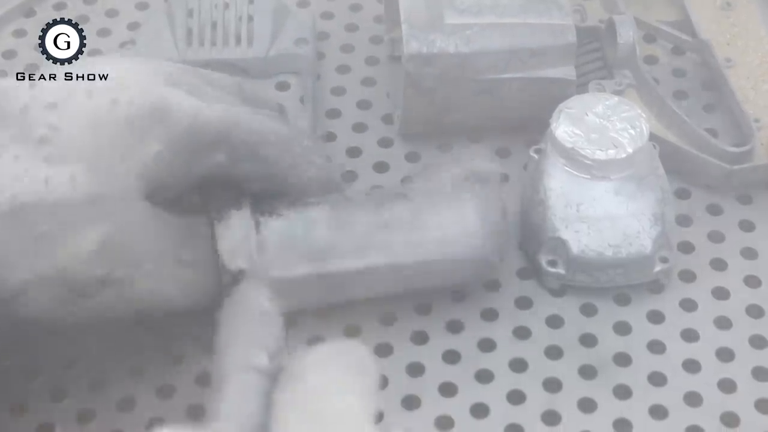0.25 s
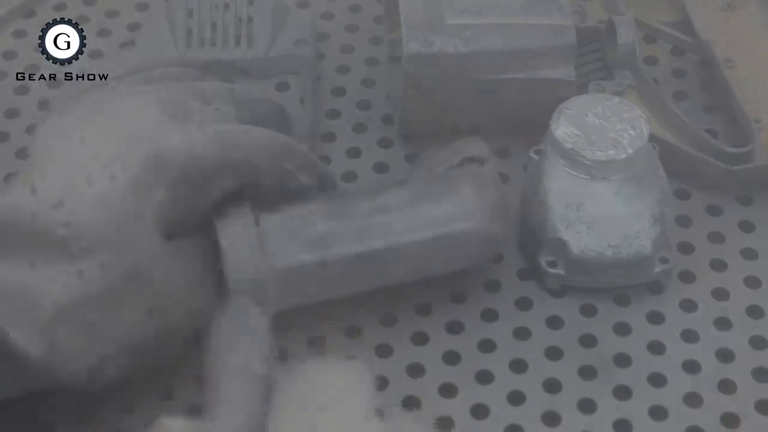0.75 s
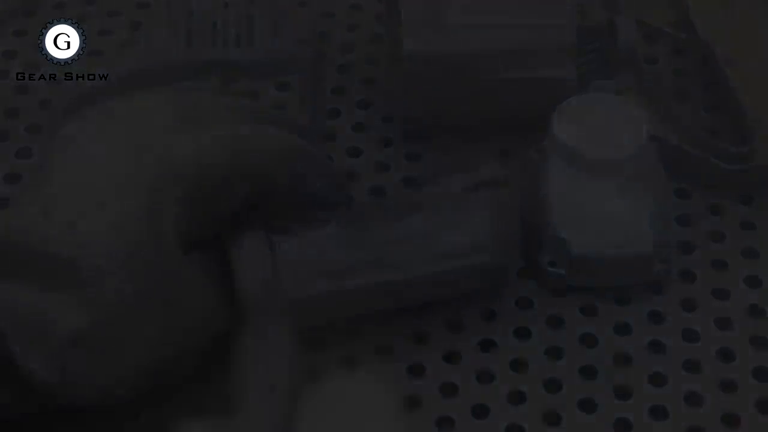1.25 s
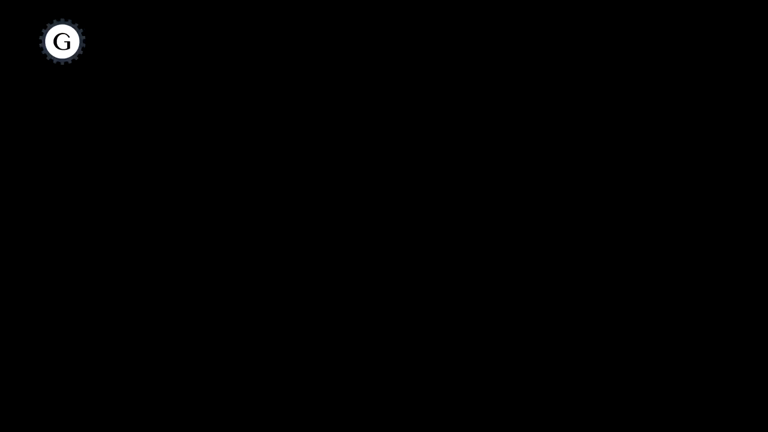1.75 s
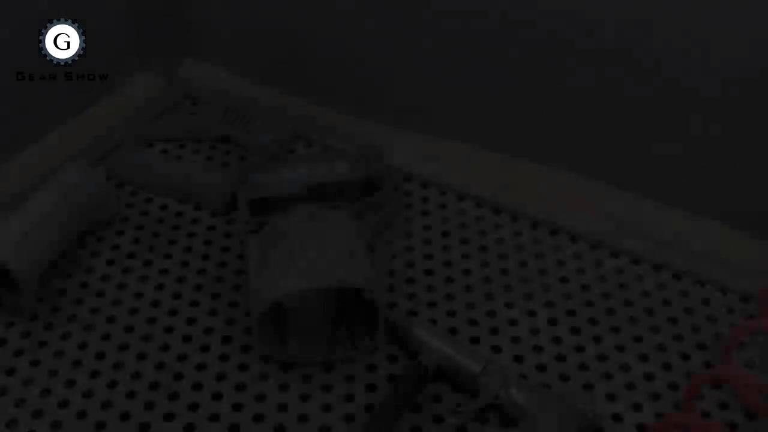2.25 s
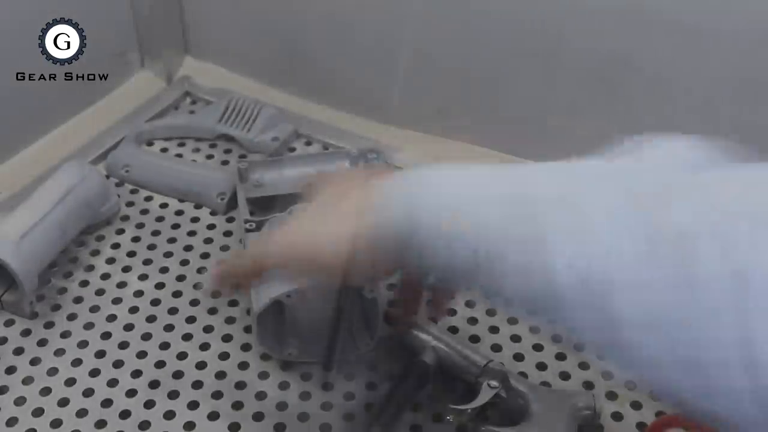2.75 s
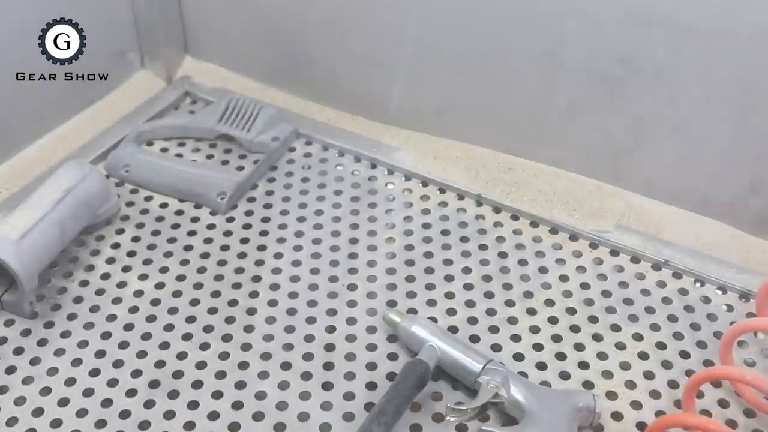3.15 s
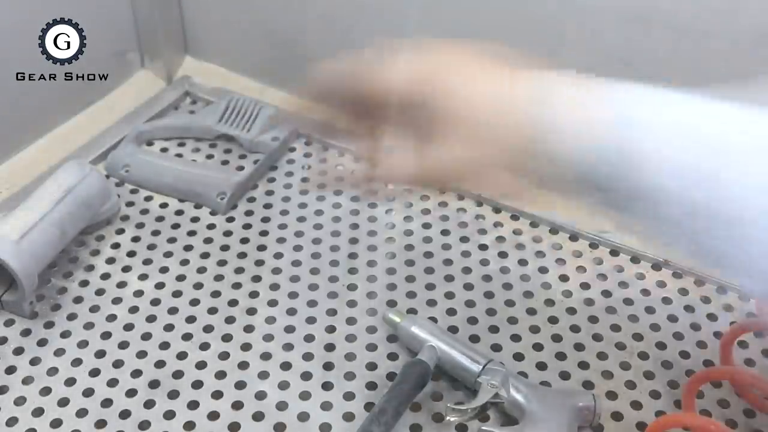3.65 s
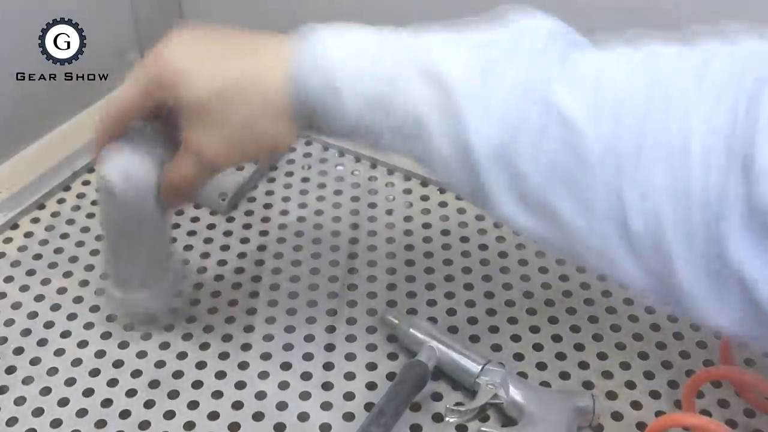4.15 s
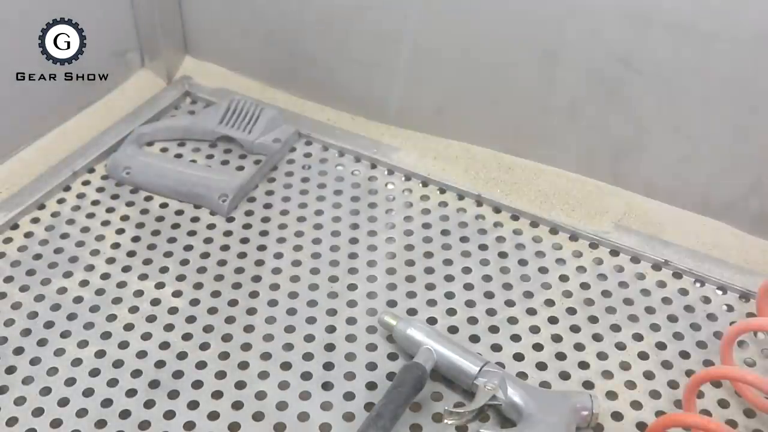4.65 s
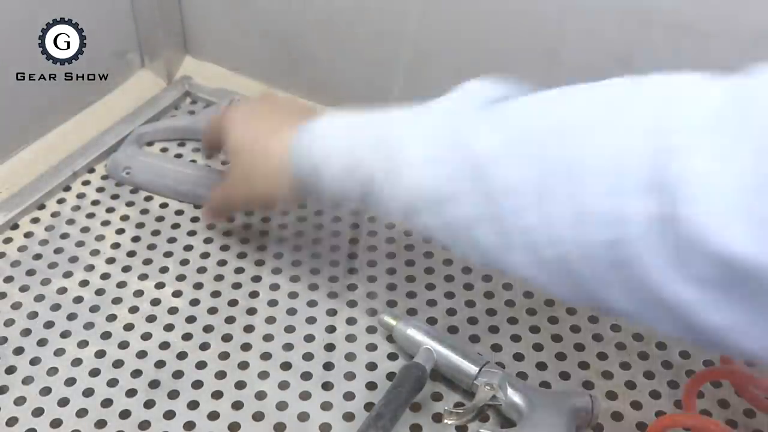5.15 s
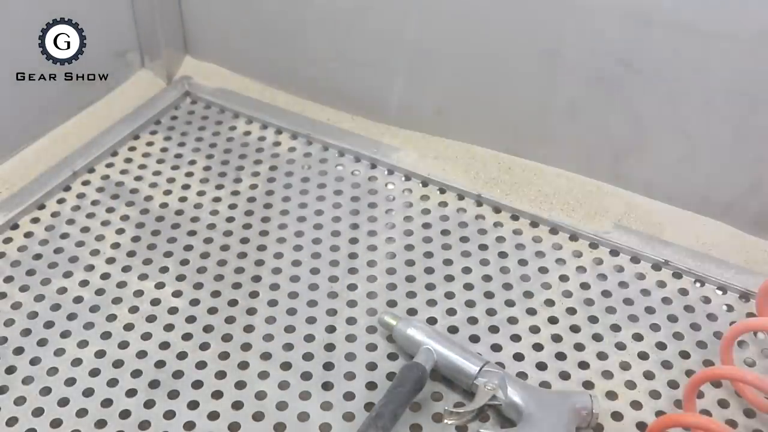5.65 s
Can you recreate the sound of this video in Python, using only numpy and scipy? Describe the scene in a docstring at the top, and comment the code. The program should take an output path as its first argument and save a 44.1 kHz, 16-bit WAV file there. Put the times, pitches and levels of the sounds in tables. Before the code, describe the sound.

The sound starts inside a steel cabinet with an air gun blasting grit at a metal part: a dense mid-low roar, gritty bright hiss, a wavering hollow howl near 630 Hz and a thin high whistle. The hiss steps up at 0.4 s; from then the blast fades smoothly, with a small hole singing around 1.0-1.3 s, to silence at 1.9 s. A faint rush of air fades in. Small knocks and a tick at 2.2 s precede a loud latch-and-slam door bang at 2.4 s. Light knocks and brushing follow near 3 s. Thumps at 4.0 s lead to three hard knocking scrapes at 4.2-4.33 s with bright tubular ringing. A strong hollow clang rings at 4.78 s, a faint one at 5.05 s. Thin shell-like rings come at 5.3 s, a soft brush at 5.5 s, and a softer clang at 5.9 s. Close microphone, short metallic reverberation.

```python
"""Grit blasting in a steel cabinet

An air gun blasts grit at a metal housing: filtered noise roars and hisses, a hollow howl and a thin whistle are
drifting sines. The blast is faded out to silence and a faint rush of air fades in. The door bangs open; parts are
lifted off the perforated grate, knocking and scraping, and set down with a clang: clicks excite coloured echoes,
and decaying sines ring as modes. Random echoes stand for the reverberation between the steel walls."""
import sys
import numpy as np
from scipy import signal
from scipy.fft import rfft, irfft
from scipy.io import wavfile

SR = 44100
rng = np.random.default_rng(int(sys.argv[2]) if len(sys.argv) > 2 else 0)


def put_to_file(sound):
    """Save the sound as 16-bit audio at rate SR, in the file named by the first command-line argument."""
    columns = np.atleast_2d(sound).T  # one column per channel
    safe = np.clip(columns, -1, 1)
    whole_steps = np.round(safe * 32767)
    wavfile.write(sys.argv[1], SR, whole_steps.astype(np.int16))


N = 260615
TIME = np.arange(N) / SR


def from_db(db):
    """Decibel law: level to amplitude gain."""
    return 10 ** (np.asarray(db) / 20)


def rms_one(x):
    """Normalisation: scale to unit mean power."""
    return x / np.sqrt(np.mean(x ** 2) + 1e-20)


def in_time(rows):
    """Linear interpolation: each column of a curve, at every sample."""
    s, *columns = np.transpose(rows)
    return [np.interp(TIME, s, c) for c in columns]


def at_hz(points, hz):
    """Logarithmic interpolation: read a table on a log-frequency axis."""
    f, value = np.transpose(points)
    return np.interp(np.log(hz + 1e-3), np.log(f), value)


def ramp(start_s, length_s):
    """Linear envelope: rises from 0 to 1 over the given time, then holds."""
    return np.clip((TIME - start_s) / length_s, 0, 1)


def hump(start_s, length_s):
    """Arched envelope: the root of a half sine rises steeply and falls back to 0 over the given time."""
    return np.sqrt(np.abs(np.sin(np.pi * ramp(start_s, length_s))))


def add(out, s, sound):
    """Superposition: mix a sound in at time s."""
    start = int(round(s * SR))
    out[start:start + len(sound)] += sound[:max(N - start, 0)]


def drift(rate):
    """Slow random modulation of rms 1: straight lines between random knots, rate of them per second."""
    knots = rng.standard_normal(int(N / SR * rate) + 3)
    return rms_one(np.interp(TIME * rate, np.arange(len(knots)), knots))


def colour(x, spectrum, tilt_db=0, size=4096):
    """Minimum-phase filtering: the folded cepstrum makes the spectrum causal; the tilt acts above about 500 Hz."""
    hz = np.arange(size // 2 + 1) * SR / size
    level_db = at_hz(spectrum, hz) + tilt_db * np.log2(1 + hz / 500)
    cepstrum = irfft(np.log(from_db(level_db)))
    cepstrum[1:size // 2] *= 2
    cepstrum[size // 2 + 1:] = 0
    return signal.fftconvolve(x, irfft(np.exp(rfft(cepstrum))))[:len(x)]


def resonate(x, hz, width):
    """Two-pole resonance: a band of the given width in Hz passes, with a gain of about 1 at its peak."""
    r = np.exp(-np.pi * width / SR)
    zeros = np.array([1, 0, -1]) * (1 - r * r) / 2
    poles = [1, -2 * r * np.cos(2 * np.pi * hz / SR), r * r]
    return signal.lfilter(zeros, poles, x)


# reverberation of the cabinet: f/Hz, t60/s
DECAY_TIMES = [(100, 0.75), (300, 0.44), (900, 0.36), (1800, 0.46), (5000, 0.36), (9000, 0.3),
               (15000, 0.23)]


def cabinet(build_s=0.0047, direct=0.031):
    """Diffuse reverberation: a click, then dense echoes that build up and decay at a rate set by frequency."""
    t, hz = TIME[:SR], np.arange(SR // 2 + 1.)
    echoes, out = rfft(rng.standard_normal(SR)), 0
    for k, (_, t60) in enumerate(DECAY_TIMES):
        # overlapping bands, each a triangle on the log-frequency axis
        share = at_hz([(f, j == k) for j, (f, _) in enumerate(DECAY_TIMES)], hz)
        out = out + irfft(echoes * share) * from_db(-60 * t / t60)
    out = out * (1 - np.exp(-t / build_s))
    return out / np.linalg.norm(out) + direct * (t == 0)


def blows(rows, spectrum, walls, chatter_s, order=2048):
    """Impact excitation: a click and a dying chatter of contacts, coloured by the struck body and its echoes."""
    out, t = np.zeros(N), TIME[:order]
    for s, level_db, tilt_db in rows:
        contact = (rng.random(order) < 500 / SR) * rng.standard_normal(order)    # 500 contacts per second
        contact = contact * 0.36 * np.exp(-t / max(chatter_s, 1e-4))
        contact[0] = 1
        sound = colour(signal.fftconvolve(walls, contact), spectrum, tilt_db)
        add(out, s, from_db(level_db) * sound / np.std(sound[:order]))
    return out


def ringing(rows, modes, swell_cycles, beat_hz, beat):
    """Modal decay: modes swell as their echoes pile up, the low ones more slowly, and beat while dying away."""
    out, t = np.zeros(N), TIME[:SR]
    for s, level_db in rows:
        for hz, mode_db, t60 in modes:
            phase, beat_phase, split = rng.uniform(0, 2 * np.pi, 3)
            swell = 1 - np.exp(-(t * hz / swell_cycles) ** 2)
            # each mode beats at between half and one and a half times beat_hz
            beating = 1 + beat * np.sin(beat_phase + 2 * np.pi * beat_hz * (1 + .5 * np.cos(split)) * t)
            decay = from_db(level_db + mode_db - 60 * t / t60)
            add(out, s, np.sin(2 * np.pi * hz * t + phase) * swell * beating * decay)
    return out


# spectrum of the background air: f/Hz, relative level/dB
AIR_COLOUR = [(24, -58.5), (40, -9.5), (96, -27), (162, -6), (336, -2.5), (597, -5), (937, -9.5),
              (1400, -11.5), (15800, -28.5)]
# fades in from the silence after the blast, then holds
SILENCE_AT_S, AIR_DB, FADE_IN_S = 1.919, -56.5, 0.33


def workshop(walls, dull_hz=2000):
    """Broadband flow noise: a faint rush of air around the cabinet fades in, the treble last."""
    fade = ramp(SILENCE_AT_S, FADE_IN_S)
    rush = rng.standard_normal(N)
    echoes = signal.fftconvolve(rush, walls)[:N]
    rush = rms_one(colour(rush + 0.54 * echoes, AIR_COLOUR))
    dull = signal.sosfilt(signal.butter(2, dull_hz, fs=SR, output="sos"), rush)
    return from_db(AIR_DB + drift(10)) * fade * (fade * rush + (1 - fade) * dull)


# soft brushing touches: t/s, relative level/dB, brightness/(dB per octave)
BRUSH_TOUCHES = [(3.162, -42, -2.2), (4.167, -43, 5), (5.530, -49, -3)]
# spectrum of a touch: f/Hz, relative level/dB
BRUSH_SPECTRUM = [(2000, -35), (2900, -7.5), (5000, -23), (7800, 0), (11000, -4), (14200, 4), (16000, -8)]


def brushing():
    """Diffuse excitation: a soft touch swells with hardly any direct click."""
    soft = cabinet(build_s=0.019, direct=.01)
    return from_db(-7.5) * blows(BRUSH_TOUCHES, BRUSH_SPECTRUM, soft, chatter_s=0.0087)


# gritty ticks: t/s, relative level/dB
GRIT_TICKS = [(2.209, -37), (2.849, -44.5), (3.776, -42), (4.612, -48), (5.338, -43), (5.38, -44)]
# spectrum of a tick: f/Hz, relative level/dB
TICK_SPECTRUM = [(1500, -22), (2900, 0.5), (4500, -3), (8000, -2), (16000, -9)]


def ticking(near):
    """Brief impact: a tick is a bright click with a short chatter."""
    rows = [(s, db, 0) for s, db in GRIT_TICKS]
    return from_db(-10.0) * blows(rows, TICK_SPECTRUM, near, chatter_s=0.005)


# single rings and thumps that colour knocks and touches, one mode each: t/s, f/Hz, level/dB, t60/s
SINGLE_RINGS = [(2.173, 1030, -36, 0.059), (2.224, 1107, -35.5, 0.1), (2.222, 308, -32, 0.17),
                (2.849, 2900, -50, 0.12), (2.961, 321, -42, 0.32), (2.969, 3950, -51, 0.36),
                (2.963, 3500, -54, 0.25), (4.063, 219, -31.5, 0.15), (4.205, 6300, -45, 0.25),
                (5.48, 1421, -52.5, 0.37), (5.598, 3520, -57, 0.27)]


def single_ringing():
    """Single-mode vibration: each ring or thump is one decaying, beating sine."""
    return sum(ringing([(s, db)], [(hz, 0, t60)], swell_cycles=2.2, beat_hz=30, beat=0.34)
               for s, hz, db, t60 in SINGLE_RINGS)


# the grip is dragged over the grate in three tugs: t/s, level/dB
TUGS = [(4.182, -31), (4.255, -29.5), (4.319, -32.5)]
# spectrum of the scraping: f/Hz, relative level/dB
SCRAPE_SPECTRUM = [(150, -18.5), (480, 4), (1200, -6.5), (4700, -5.5), (5600, -17), (15000, -28)]
# each tug is a run of uneven slips
DRAG_S, SLIPS_PER_S, SLIP_SPREAD_DB = 0.041, 264, 4


def scraping():
    """Stick-slip friction: each tug is a burst of sharp, uneven contacts."""
    walls = cabinet(build_s=0.002, direct=0.86)    # the dragged edge faces the microphone
    stroke = sum(from_db(db) * hump(s, DRAG_S) for s, db in TUGS)
    slips = (rng.random(N) < SLIPS_PER_S / SR) * rng.choice([-1, 1], N)
    slips = slips * from_db(SLIP_SPREAD_DB * rng.uniform(-1, 1, N))
    response = colour(walls, SCRAPE_SPECTRUM)
    return signal.fftconvolve(stroke * rms_one(slips), response / np.linalg.norm(response))[:N]


# the grip catches on the holes of the grate: t/s, level/dB
GRIP_CATCHES = [(4.188, -50), (4.258, -45), (4.327, -42), (4.348, -41.5)]
# modes of the tubular grip: f/Hz, relative level/dB, t60/s
GRIP_MODES = [(7000, -10, 0.24), (7950, -7, 0.32), (8500, -1, 0.23), (11700, -10, .19), (12840, -11, .18)]


def grip_ringing():
    """Modal vibration of a tube: bright modes ring at every catch."""
    return ringing(GRIP_CATCHES, GRIP_MODES, swell_cycles=83, beat_hz=25, beat=0.55)


# blows that set the thin shell ringing: t/s, level/dB
SHELL_BLOWS = [(5.311, -48), (5.353, -40.5)]
# modes of the thin shell: f/Hz, relative level/dB, t60/s
SHELL_MODES = [(3020, 0.5, 0.38), (3460, -2, 0.29), (6869, -13, 0.28), (7560, -18, .25), (9076, -13, 0.35),
               (12950, -16, .24)]


def shell_ringing():
    """Modal vibration of a shell: high modes ring and beat strongly."""
    return ringing(SHELL_BLOWS, SHELL_MODES, swell_cycles=56, beat_hz=19.6, beat=0.62)


# parts knocking on the grate: t/s, relative level/dB, brightness/(dB per octave)
GRATE_KNOCKS = [(2.174, -36.5, -2), (2.224, -30.5, -3), (2.960, -40, 1.5), (3.990, -33, -1.8),
                (4.057, -31.5, -1.3), (4.174, -31, 1), (4.185, -20, 0.4), (4.257, -20, -0.9),
                (4.327, -22.5, 0.2), (5.310, -33, -0.5), (5.358, -35.5, 2)]
# spectrum of a knock: f/Hz, relative level/dB
GRATE_SPECTRUM = [(45, -52), (130, -12.5), (184, -13.5), (216, -5), (470, -2), (550, -5), (745, -7),
                  (1110, -13), (3560, -18.5), (5420, -27), (8640, -29.5), (15800, -41)]
# modes of the grate under every knock: f/Hz, relative level/dB, t60/s
GRATE_MODES = [(217, -14, 0.28), (329.2, -7, 0.31), (460, -6, 0.13)]
# every knock rebounds once, more softly
REBOUND_S, REBOUND_LOSS_DB = 0.024, 8


def knocking(near):
    """Impact with rebound: the part strikes the grate twice, and the first blow sets its modes ringing."""
    rebounds = [(s + REBOUND_S, db - REBOUND_LOSS_DB, tilt) for s, db, tilt in GRATE_KNOCKS]
    knocks = from_db(-9.5) * blows(GRATE_KNOCKS + rebounds, GRATE_SPECTRUM, near, chatter_s=0.015)
    hits = [(s, db) for s, db, _ in GRATE_KNOCKS]
    thumps = from_db(-1.5) * ringing(hits, GRATE_MODES, swell_cycles=3.8, beat_hz=18, beat=0.34)
    return knocks + thumps


# the housing is set down and rocks:
# t/s, relative level/dB, brightness/(dB per octave), ringing level/dB
HOUSING_CLANGS = [(4.767, -26, -5, -57), (4.778, -23.5, -4.5, -14), (5.05, -51.5, 0, -43.5),
                  (5.892, -29, 0, -20)]
# spectrum of the contact: f/Hz, relative level/dB
CLANG_SPECTRUM = [(150, -54.5), (750, -27), (960, -14), (1200, -19), (1450, -1.5), (1820, -12), (2100, -9),
                  (3600, -4), (4700, -21), (16000, -32)]
# modes of the hollow housing: f/Hz, relative level/dB, t60/s
HOUSING_MODES = [(931, -19, .28), (1340, -9, .19), (1427, 7.5, .24), (1431, -26, .8), (1657, -1.5, .36),
                 (2040, -13, .2), (2213, -14, .26), (2750, -15, .25), (2821, -14, .29), (3031, -11, .29),
                 (3278, -9, .26), (3463, -11, .24), (3503, -7, .29), (3646, -15, .38), (3774, -18, .36),
                 (3931, -16, .33), (5329, -16, .29), (6115, -26, .28), (7660, -21, .25)]
# its many weak upper modes lie at random pitches; UPPER_DB holds at the lowest pitch
UPPER_LOW_HZ, UPPER_HIGH_HZ, UPPER_DB, UPPER_T60_S = 4100, 11000, -29, 0.27


def clanging(near):
    """Modal vibration of a hollow body: a contact crack, then many modes that swell, beat and decay."""
    damped = near * np.exp(-TIME[:SR] / 0.36)    # hastens the decay of the crack
    cracks = [(s, db, tilt) for s, db, tilt, _ in HOUSING_CLANGS]
    clank = from_db(-2) * blows(cracks, CLANG_SPECTRUM, damped, chatter_s=0.007)
    upper = [(hz, UPPER_DB - 20 * np.log10(hz / UPPER_LOW_HZ), UPPER_T60_S)
             for hz in rng.uniform(UPPER_LOW_HZ, UPPER_HIGH_HZ, size=24)]
    rings = [(s, ring_db) for s, _, _, ring_db in HOUSING_CLANGS]
    return clank + ringing(rings, HOUSING_MODES + upper, swell_cycles=50, beat_hz=22, beat=.45)


# blows of the door, latch then slam: t/s, level/dB, brightness/(dB per octave)
DOOR_BLOWS = [(2.398, -23, 2.5), (2.410, -14.5, 2)]
# spectrum of a door blow: f/Hz, relative level/dB
DOOR_SPECTRUM = [(30, -33.5), (100, -35), (162, -24), (261, -3), (344, -6.5), (390, -18.5), (570, -8),
                 (748, -11), (1150, -10.5), (2000, -11), (3300, -17), (4500, -21.5), (5400, -18.5),
                 (7900, -20.5), (14000, -30), (15800, -41.5)]
# modes of the door panel: f/Hz, relative level/dB, t60/s
PANEL_MODES = [(264, -11, .19), (583, -8, .3), (1410, -15, .33), (1556, -18, .37), (1723, -18, .4),
               (1951, -16, .3), (2181, -16, .32), (2332, -15, .34), (2548, -14, .36), (5206, -24, .42),
               (5380, -15.5, .4)]


def door_bang(walls):
    """Plate vibration: latch and slam strike the door, and the slam sets its panel ringing."""
    bangs = blows(DOOR_BLOWS, DOOR_SPECTRUM, walls, chatter_s=0.0074)
    slam = [(DOOR_BLOWS[-1][0], -17)]
    return bangs + ringing(slam, PANEL_MODES, swell_cycles=16, beat_hz=5.1, beat=0.44)


def handling(walls):
    """Superposition of contacts: the door, parts bumping, dragging and set down, ticks and brushing touches."""
    near = cabinet(build_s=0.0013, direct=0.29)    # parts on the grate lie close to the microphone
    touches = brushing() + ticking(near) + single_ringing() + scraping()
    parts = grip_ringing() + shell_ringing() + knocking(near) + clanging(near)
    return touches + parts + door_bang(walls)


# spectrum of the roar: f/Hz, relative level/dB
ROAR_COLOUR = [(40, -63.5), (107, -38.5), (214, -9), (637, -7), (800, -10.5), (1050, -8), (2440, -18.5),
               (3270, -22), (6000, -40), (7800, -35), (13200, -120)]
# cavities that the jet excites: f/Hz, width/Hz, relative level/dB
JET_CAVITIES = [(304.3, 21.7, 2), (957, 29, 5), (1143, 25, 0), (1326, 42, -2.5), (2034, 117, -8.5),
                (2680, 140, -13), (3214, 130, -10.5), (3790, 70, -20.5)]
ROAR_DB, CAVITY_DB = -28.5, -32.5


def jet_roar(turbulence, in_cavity, walls):
    """Turbulence noise: a broadband roar, and cavities that resonate under random excitation."""
    echoes = signal.fftconvolve(turbulence, walls)[:N]
    roar = rms_one(colour(turbulence + 0.49 * echoes, ROAR_COLOUR))
    hollow = rms_one(sum(from_db(db) * resonate(in_cavity, hz, width) for hz, width, db in JET_CAVITIES))
    return from_db(ROAR_DB) * roar + from_db(CAVITY_DB) * hollow


# spectrum of air and grit: f/Hz, relative level/dB
HISS_COLOUR = [(1200, -40), (2800, 3.5), (4200, 0), (5500, -2.5), (7200, 1), (10000, -2), (13500, -5),
               (16000, -12)]
# the grit feed picks up: the hiss rises by FEED_HISS_DB
FEED_AT_S, FEED_RISE_S, HISS_DB, FEED_HISS_DB = 0.407, 0.025, -39.5, 5


def grit_hiss(air, walls, grains_per_s=9000, grit=0.76):
    """Shot noise: grit strikes the metal as a dense random spray of impulses, mixed with echoing air noise."""
    feed = ramp(FEED_AT_S, FEED_RISE_S)
    grains = (rng.random(N) < grains_per_s / SR) * rng.standard_normal(N)
    spray = signal.fftconvolve(air, walls)[:N] + grit * rms_one(grains)
    return from_db(HISS_DB + FEED_HISS_DB * feed) * rms_one(colour(spray, HISS_COLOUR))


# howl of the hollow part as the jet crosses its mouth: t/s, mean level/dB
HOWL_CURVE = [(0, -39.5), (0.3, -28), (0.53, -30.5), (0.63, -43), (1.7, -33)]


def hollow_howl(howl_hz=634):
    """Cavity tone: air blown across the mouth of the part locks onto one unsteady note."""
    howl_db, = in_time(HOWL_CURVE)
    angle = 2 * np.pi * np.cumsum(howl_hz + 4.3 * drift(45.25)) / SR
    return from_db(howl_db + 2 * drift(24.3)) * np.sin(angle)


# the nozzle whistle creeps sharp while its level varies: t/s, mean f/Hz, level/dB
WHISTLE_CURVE = [(0, 4422, -44.5), (0.21, 4429, -44.5), (0.29, 4434, -37), (0.36, 4440, -53),
                 (0.47, 4465, -43), (0.76, 4480, -55), (0.89, 4480, -47.5), (1.7, 4480, -44)]
# its first harmonics: relative level/dB
WHISTLE_HARMONICS = [0, -4.5, -16]


def nozzle_whistle():
    """Harmonic tone: a jittering fundamental and its overtones, whose levels waver more the higher they lie."""
    whistle_hz, whistle_db = in_time(WHISTLE_CURVE)
    angle = 2 * np.pi * np.cumsum(whistle_hz + 6 * drift(300)) / SR
    out = np.zeros(N)
    for harmonic, db in enumerate(WHISTLE_HARMONICS, 1):
        out += from_db(whistle_db + db + 1.5 * harmonic * drift(15.0)) * np.sin(harmonic * angle)
    return out


SING_AT_S, SING_S, SING_HZ, SING_WIDTH_HZ, SING_DB = 1.03, 0.31, 3130, 30, -42


def hole_singing(in_cavity):
    """Narrow-band resonance: a small hole sings as the jet passes over it."""
    tone = rms_one(resonate(in_cavity, SING_HZ, SING_WIDTH_HZ))
    return from_db(SING_DB) * hump(SING_AT_S, SING_S) * tone


FADE_OUT_S = 1.5    # the blast is faded out along a quarter sine to silence at SILENCE_AT_S


def blast(walls, flutter_db=.5):
    """Jet noise: roar, hiss, howl, whistle and singing share one fluttering level and one fade-out."""
    fade = np.cos(np.pi / 2 * ramp(SILENCE_AT_S - FADE_OUT_S, FADE_OUT_S))
    turbulence, air, in_cavity = rng.standard_normal((3, N))
    noise = jet_roar(turbulence, in_cavity, walls) + grit_hiss(air, walls)
    tones = hollow_howl() + nozzle_whistle() + hole_singing(in_cavity)
    return (noise + tones) * from_db(flutter_db * drift(23.7)) * fade


def scene():
    """Superposition: all sources sound in one cabinet at one microphone, the same in both channels."""
    walls = cabinet()
    return np.tile(workshop(walls) + handling(walls) + blast(walls), (2, 1))


CUTOFF_HZ = 15850


def record(dry, ceiling=0.6):
    """Soft saturation and low-pass filtering: the loudest peaks are rounded and the top is cut steeply."""
    rounded = ceiling * np.tanh(dry / ceiling)
    return signal.sosfilt(signal.ellip(12, .1, 90, CUTOFF_HZ, fs=SR, output="sos"), rounded)


dry = scene()
out = record(dry)
put_to_file(out)
```